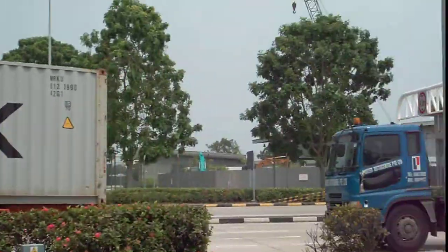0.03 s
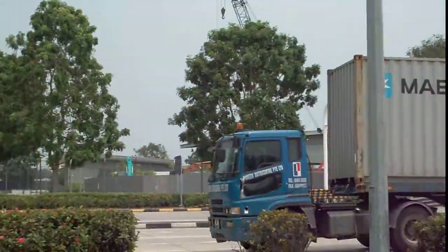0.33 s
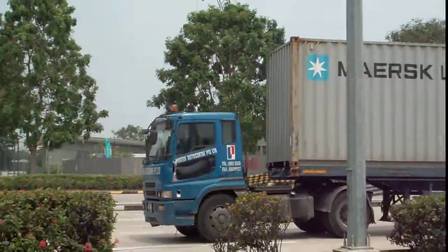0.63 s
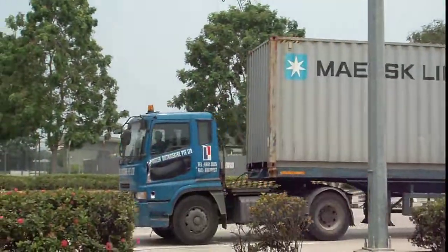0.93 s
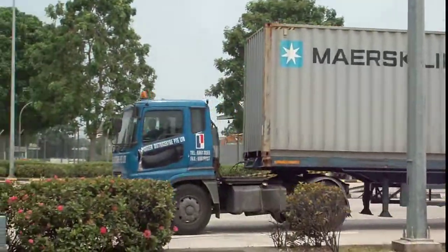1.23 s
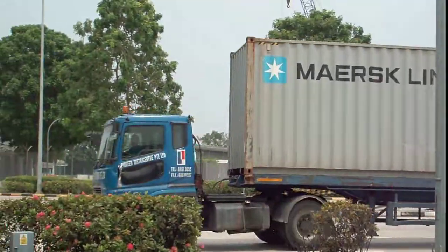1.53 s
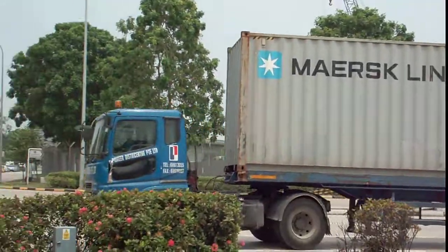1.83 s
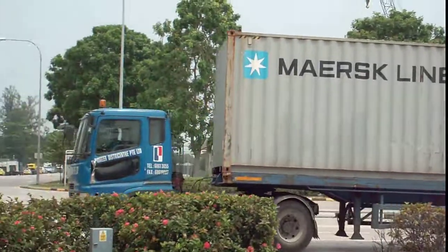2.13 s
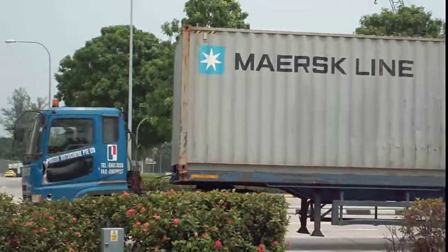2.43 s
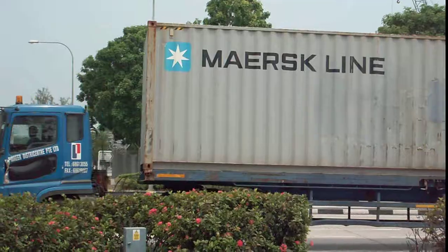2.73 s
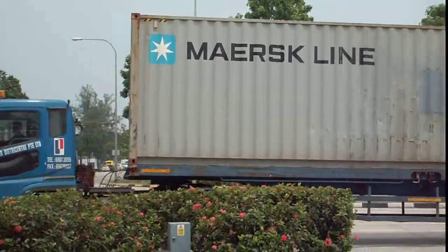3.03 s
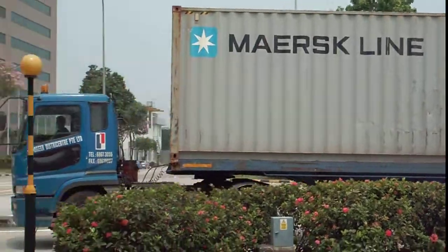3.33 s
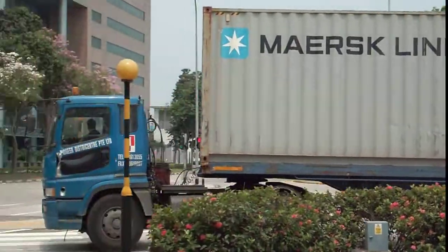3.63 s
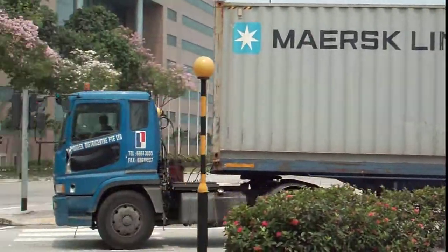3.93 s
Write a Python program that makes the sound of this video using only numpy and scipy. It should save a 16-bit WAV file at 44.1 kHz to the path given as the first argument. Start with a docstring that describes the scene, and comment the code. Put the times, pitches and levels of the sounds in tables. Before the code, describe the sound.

A container truck rolls by, engine growling and tyres roaring, as its air brakes hiss once.

```python
"""At the roadside, a container truck rolls past close by, its diesel slowly gathering speed.
The firing cylinders make the exhaust boom and the engine growl and clatter, while the tyres roar.
The trailer knocks lightly, and near 2.8 s the air brakes let off one sharp hiss.
Wind bumps the microphone of a small camera, which rings at three pitches and adds its own thin whine."""
import sys
import numpy as np
from scipy import signal
from scipy.fft import rfft, irfft
from scipy.io import wavfile

SR = 44100
rng = np.random.default_rng(int(sys.argv[2]) if len(sys.argv) > 2 else 0)


def transcribe(signal):
    """Save signal, clipped to [-1, 1], as a 16-bit WAV file at the path in sys.argv[1]."""
    frames = np.atleast_2d(signal).T
    limited = np.clip(frames, -1, 1)
    pcm = np.round(limited * 32767).astype(np.int16)
    wavfile.write(sys.argv[1], SR, pcm)


N = 176400  # 4 seconds

# A SPECTRUM table says how strong low and high pitches are; a LEVEL table says how loud, and when.
# engine speed and exhaust loudness: time_s, firing_rate_hz, level_db
ENGINE = [(0, 57.5, -23.5), (.45, 58, -22), (.8, 59.42, -20), (1.3, 60.92, -20), (1.7, 62.14, -20.5),
          (2.05, 63.15, -21), (2.4, 63.59, -24.5), (2.8, 64.88, -21), (3.1, 65.25, -21.5),
          (3.4, 66.8, -21.5), (4, 67.7, -22.5)]
# tones that follow the engine speed: multiple_of_firing_rate, level_vs_boom_db
EXHAUST_TONES = [(.445, -15.5), (.82, -14), (2, -23.5), (2.64, -19), (4, -26.5), (4.93, -25.5)]
# growl of the firings in the truck's frame: pitch_hz, strength_db
GROWL_SPECTRUM = [(60, -13), (110, 12.5), (160, -0.5), (240, 7), (310, -1), (420, -7), (650, -15.5),
                  (1500, -35.5)]
# time_s, level_db
GROWL_LEVEL = [(0, -31), (.6, -28.5), (1.3, -34.5), (2.2, -33), (3.3, -33.5), (4, -33.5)]
# diesel clatter: pitch_hz, strength_db
CLATTER_SPECTRUM = [(900, -51), (1900, -8.5), (2400, 1.5), (2900, 2), (3500, -0.5), (4500, -4.5),
                    (5400, -11), (6600, -24), (8400, -19), (10000, -17), (12400, -23.5), (15500, -35)]
# time_s, level_db
CLATTER_LEVEL = [(0, -33.5), (.7, -34), (1.4, -33.5), (1.53, -31.5), (1.8, -33), (2.2, -32.5),
                 (2.45, -35.5), (2.7, -33), (3.2, -33), (3.6, -34.5), (4, -33)]
# tyres and nearby traffic: pitch_hz, strength_db
TYRE_SPECTRUM = [(30, 2.5), (90, 1), (150, -1), (300, 0.5), (400, -3.5), (520, -10.5), (680, -13.5),
                 (900, -8), (1150, -15.5), (1450, -10.5), (1800, -16.5), (3000, -20.5), (7000, -27),
                 (15500, -35.5)]
# time_s, level_db
TYRE_LEVEL = [(0, -29.5), (.5, -30), (1, -29), (1.5, -28), (2.2, -29), (2.6, -29.5), (3.3, -29.5),
              (4, -31.5)]
# airy rush from the truck's side: pitch_hz, strength_db
RUSH_SPECTRUM = [(2500, -35), (3500, -5), (4080, 1.5), (4500, -4), (5200, -17), (7000, -32), (12000, -35)]
# time_s, level_db
RUSH_LEVEL = [(0, -42), (.7, -39), (1.3, -34.5), (1.7, -37.5), (2.1, -50), (2.5, -57), (4, -58)]
# faint sizzle while the cab is closest: pitch_hz, strength_db
SIZZLE_SPECTRUM = [(8500, -29), (9300, -9), (9700, 10), (10200, -7), (11200, -25)]
# metallic rasp as the diesel clatter swells: pitch_hz, strength_db
RASP_SPECTRUM = [(2000, -16), (2600, -5), (2950, 6.5), (3300, -13), (4200, -32)]
# wind on the microphone: pitch_hz, strength_db
WIND_SPECTRUM = [(8, -10), (25, -1.5), (40, -6.5), (62, -8), (85, -5.5), (130, -21), (260, -26),
                 (1000, -65)]
# time_s, level_db
WIND_LEVEL = [(0, -26), (.4, -26.5), (.8, -59), (1.4, -33.5), (1.85, -24.5), (1.97, -17.5), (2.1, -22.5),
              (2.4, -24.5), (3, -35.5), (4, -34)]
# single puffs of wind: time_s, level_db, width_s, low_cut_hz
WIND_BUMPS = [(1.136, 6, 0.0052, 48), (1.935, -0.5, .003, 11), (2.043, -5.5, 0.0011, 36),
              (2.056, -8.5, 0.0051, 7.6)]
# the trailer's knocks, clinks and thuds: start_s, level_db, pitch_hz, decay_s
TRAILER_KNOCKS = [(1.116, -26.5, 990, 0.0056), (1.267, -13, 930, 0.0017), (1.518, -27, 2500, 0.013),
                  (2.25, -24.5, 196, 0.047), (3.946, -28, 2596, 0.013)]
# air escaping from the brakes: pitch_hz, strength_db
HISS_SPECTRUM = [(300, -50), (800, -37), (1500, -6), (2000, -15), (2400, -0.5), (2900, 1.5), (3400, 2.5),
                 (4300, -1.5), (5200, -2.5), (6200, -6), (8300, -8.5), (10200, -4.5), (11800, -13),
                 (13500, -23), (15500, -32)]
# where the microphone rings: pitch_hz, width_hz, boost_db
MIC_RESONANCES = [(943, 144, 11), (2863, 160, 6.5), (10200, 880, 8.5)]

TIME_S = np.arange(N) / SR


def from_db(db):
    """Turn decibels into a number to multiply by."""
    return 10 ** (np.asarray(db) / 20)


def unit_power(x):
    """Scale a signal so its average power is 1."""
    return x / np.sqrt(np.mean(x ** 2) + 1e-20)


def over_time(table, column=1):
    """Join a table's points with straight lines, giving one value per sample."""
    table = np.array(table)
    return np.interp(TIME_S, table[:, 0], table[:, column])


def drift(rate_hz):
    """A smooth random wobble, about 1 in size; a higher rate wobbles faster."""
    step, warm_up = 40, 2000
    memory = np.exp(-2 * np.pi * rate_hz * step / SR)
    draws = rng.standard_normal(N // step + warm_up + 2)
    slow = signal.lfilter([1], [1, -2 * memory, memory ** 2], draws)[warm_up:]
    return np.interp(np.arange(N) / step, np.arange(len(slow)), unit_power(slow))


def noise(spectrum, pulses=1):
    """Noise, pulsed if asked, then shaped by a spectrum and scaled to power 1."""
    hz, db = np.transpose(spectrum)
    bins_hz = np.maximum(np.arange(N // 2 + 1) * SR / N, 1)
    gain = from_db(np.interp(np.log(bins_hz), np.log(hz), db))
    return unit_power(irfft(rfft(pulses * rng.standard_normal(N)) * gain, N))


def swell(peak_s, width_s, peak_db):
    """A smooth rise and fall around one moment."""
    return from_db(peak_db) * np.exp(-((TIME_S - peak_s) / width_s) ** 2)


def exhaust(firings, panel_hz=295.8, panel_width_hz=2.3, panel_boost_db=13.5):
    """A deep boom at the firing rate, with weaker wavering tones tied to it."""
    boom = np.sin(2 * np.pi * firings) * from_db(0.44 * drift(3.3))
    for multiple, db in EXHAUST_TONES:
        # a body panel rings when a tone slides through its pitch
        off_pitch = (multiple * over_time(ENGINE) - panel_hz) / panel_width_hz
        ring_db = panel_boost_db / (1 + off_pitch ** 2)
        tone = np.sin(2 * np.pi * (multiple * firings + rng.random()))
        boom += tone * from_db(db + ring_db + 3.5 * drift(3.4))
    return np.sqrt(2) * boom * from_db(over_time(ENGINE, column=2))


def engine_block(firings, cylinders=6, pulsed_share=0.14):
    """Uneven cylinders fire in turn; each burst makes a low growl and a bright clatter."""
    which_firing, progress = firings.astype(int), firings % 1
    cylinder_db = np.cos(2 * np.pi * which_firing / cylinders)
    chance_db = 2.5 * rng.standard_normal(N)[which_firing]
    bursts = unit_power(from_db(cylinder_db + chance_db) * np.exp(-progress / 0.38))
    growl = from_db(over_time(GROWL_LEVEL)) * noise(GROWL_SPECTRUM, bursts)
    flicker = (1 - pulsed_share + pulsed_share * bursts) * from_db(0.88 * drift(35))
    clatter = from_db(over_time(CLATTER_LEVEL)) * noise(CLATTER_SPECTRUM, flicker)
    return growl + clatter


def rolling():
    """Tyres roar; a rush and a sizzle swell in turn as the wheels go by, and the diesel clatter swells into a
    rasp."""
    sizzle = swell(peak_s=1.7, width_s=0.34, peak_db=-52.5) * noise(SIZZLE_SPECTRUM)
    rasp = swell(peak_s=2.02, width_s=0.48, peak_db=-39) * noise(RASP_SPECTRUM)
    roar = from_db(over_time(TYRE_LEVEL)) * noise(TYRE_SPECTRUM)
    rush = from_db(over_time(RUSH_LEVEL)) * noise(RUSH_SPECTRUM)
    return roar + rush + sizzle + rasp


def squeaks(per_second=22, pitch_hz=4080, spread_hz=130, width_s=0.0059):
    """Rubbing metal chirps at random moments, growing and fading with the rush."""
    out = np.zeros(N)
    for when, pitch_draw, size in rng.random((int(per_second * N / SR), 3)):
        middle = int(when * N)
        near = slice(max(middle - SR // 20, 0), middle + SR // 20)
        offset_s = TIME_S[near] - when * N / SR
        hz = pitch_hz + spread_hz * (2 * pitch_draw - 1)
        shape = 2 * size * np.exp(-(offset_s / width_s) ** 2 / 2)
        out[near] += shape * np.sin(2 * np.pi * hz * offset_s)
    return out * from_db(over_time(RUSH_LEVEL) + 2.5)


def wind():
    """Gusts hit the microphone, making a low rumble and a few dull bumps."""
    out = from_db(over_time(WIND_LEVEL) - drift(18)) * noise(WIND_SPECTRUM)
    for time_s, db, width_s, low_cut_hz in WIND_BUMPS:
        puff = from_db(db) / (1 + ((TIME_S - time_s) / width_s) ** 2 / 2) ** 2
        out += signal.sosfilt(signal.butter(2, low_cut_hz, "high", fs=SR, output="sos"), puff)
    return out


def camera_whine(pitch_hz, level_db, octave_db):
    """A thin steady tone from the camera itself, plus a fainter one an octave up."""
    angle = 2 * np.pi * pitch_hz * TIME_S
    return np.sqrt(2) * (from_db(level_db) * np.sin(angle) + from_db(octave_db) * np.sin(2 * angle))


def trailer_knocks(band_ratio=1.61):
    """Each knock is a quickly fading burst of noise around its own pitch."""
    out = np.zeros(N)
    for start_s, db, hz, decay_s in TRAILER_KNOCKS:
        band = signal.butter(3, [hz / band_ratio, hz * band_ratio], "band", fs=SR, output="sos")
        shake = unit_power(signal.sosfilt(band, rng.standard_normal(N)))
        fade = (TIME_S >= start_s) * np.exp(-np.abs(TIME_S - start_s) / decay_s)
        out += signal.sosfilt(band, from_db(db) * fade * shake + 1e-18)
    return out


def valve_flow(age_s, leak_s=0.054, leak_share=0.43, rise_s=0.017, hold_s=0.058, fall_db_per_s=73):
    """The brake valve seeps, snaps open, and the flow dies away as the pressure drains."""
    seep = leak_share * np.clip(1 + age_s / leak_s, 0, 1)
    snap = (1 - leak_share) * np.clip(age_s / rise_s, 0, 1)
    draining_s = np.maximum(age_s - rise_s - hold_s, 0)
    return (seep + snap) * from_db(-fall_db_per_s * draining_s)


def air_brake(open_s=2.798, level_db=-19.5, split_hz=8500, lag_s=0.015):
    """One fluttering jet of air, whose highest part builds and fades a little later."""
    age_s = TIME_S - open_s
    jet = noise(HISS_SPECTRUM)
    highs = signal.sosfiltfilt(signal.butter(2, split_hz, "high", fs=SR, output="sos"), jet)
    hiss = valve_flow(age_s) * (jet - highs) + valve_flow(age_s - lag_s) * highs
    return hiss * from_db(level_db + 0.6 * drift(50))


def scene():
    """Add the truck, the wind and the camera's whine into one channel."""
    firing_rate_hz = over_time(ENGINE) * (1 + 0.003 * drift(8))
    firings = np.cumsum(firing_rate_hz) / SR  # how many firings so far
    engine = exhaust(firings) + engine_block(firings)
    truck = engine + rolling() + squeaks() + trailer_knocks() + air_brake()
    whine = camera_whine(pitch_hz=5900, level_db=-58, octave_db=-64)
    whine += camera_whine(pitch_hz=7867, level_db=-48, octave_db=-62)
    return (truck + wind() + whine)[None]


def record(dry):
    """The microphone boosts the pitches it rings at, and the very highest sounds are cut."""
    out, cutoff_hz = dry, 15800
    for hz, width_hz, boost_db in MIC_RESONANCES:
        ringing = signal.lfilter(*signal.iirpeak(hz, hz / width_hz, fs=SR), out)
        out = out + (from_db(boost_db) - 1) * ringing
    return signal.sosfilt(signal.ellip(12, .1, 90, cutoff_hz, fs=SR, output="sos"), out)


dry = scene()
out = record(dry)
transcribe(out)
```